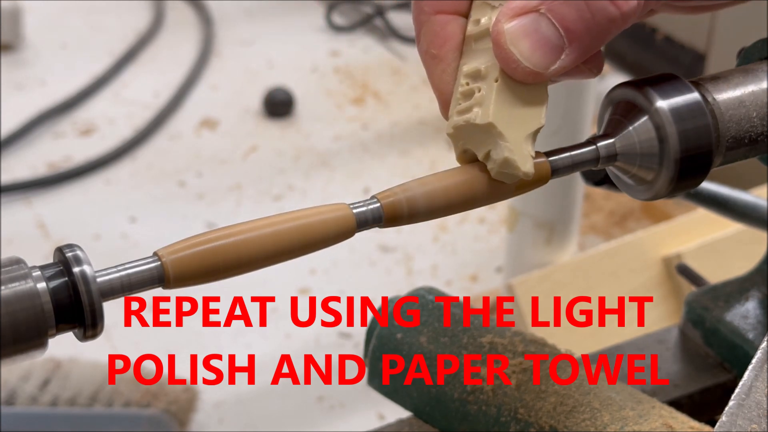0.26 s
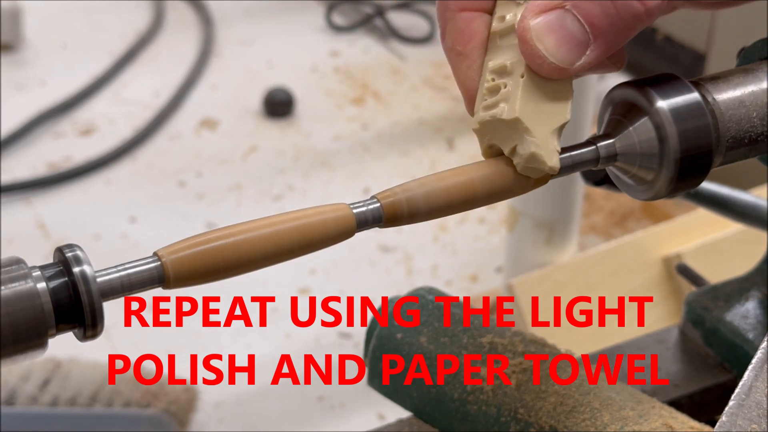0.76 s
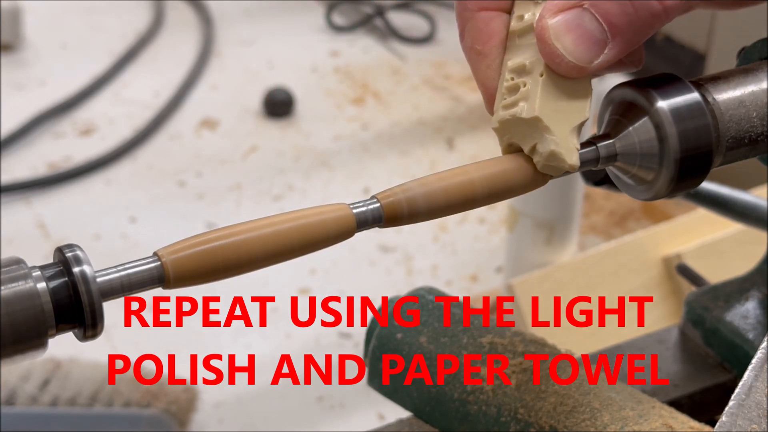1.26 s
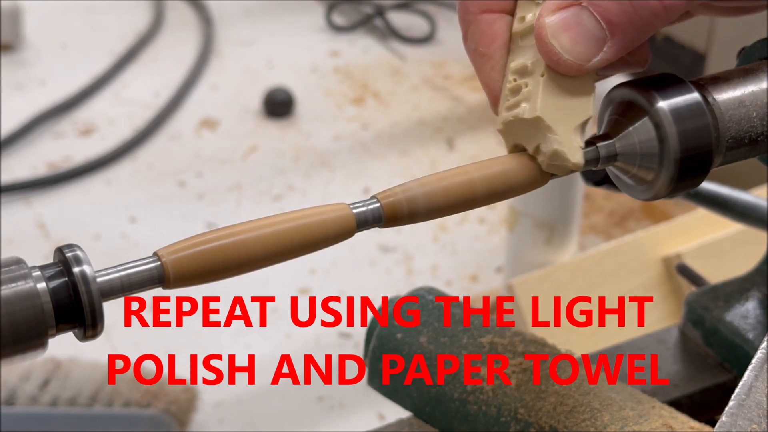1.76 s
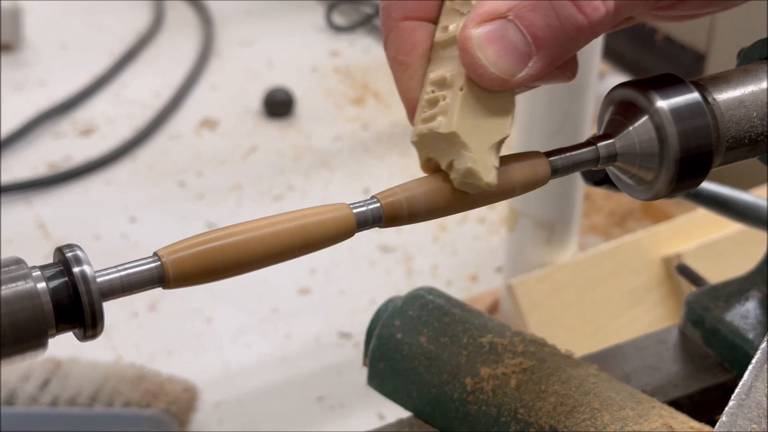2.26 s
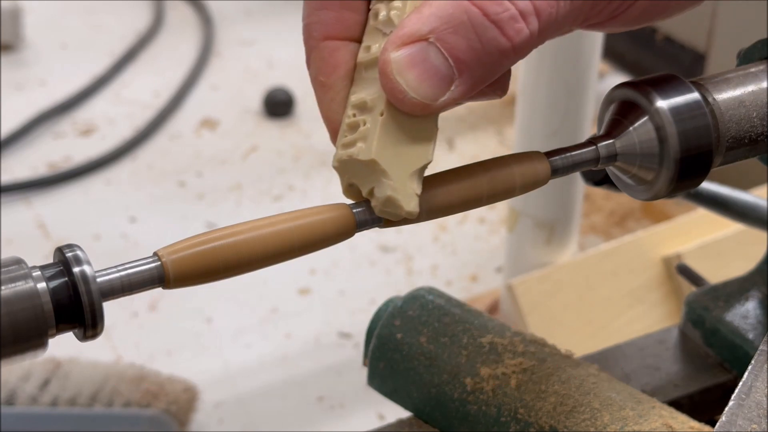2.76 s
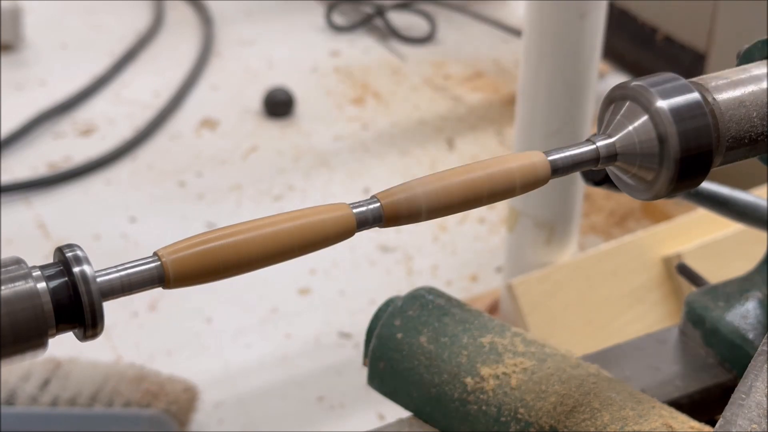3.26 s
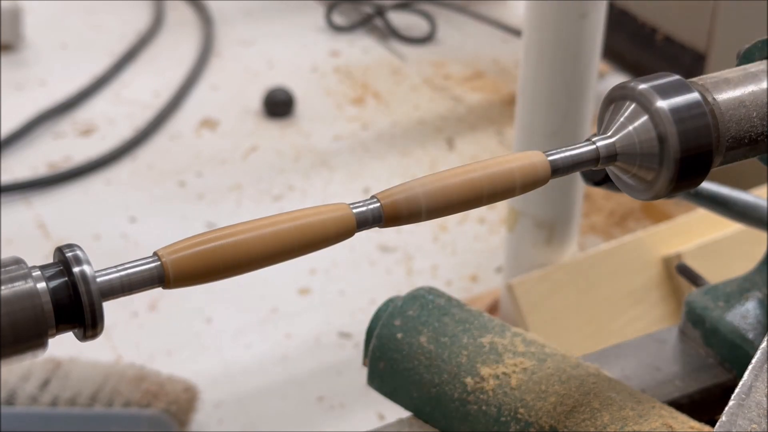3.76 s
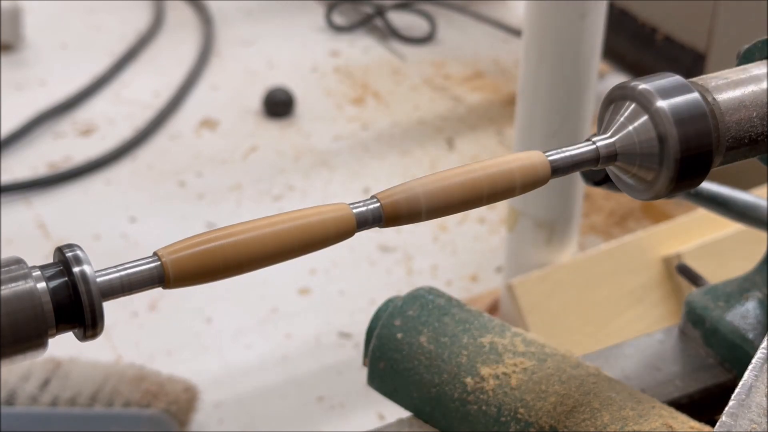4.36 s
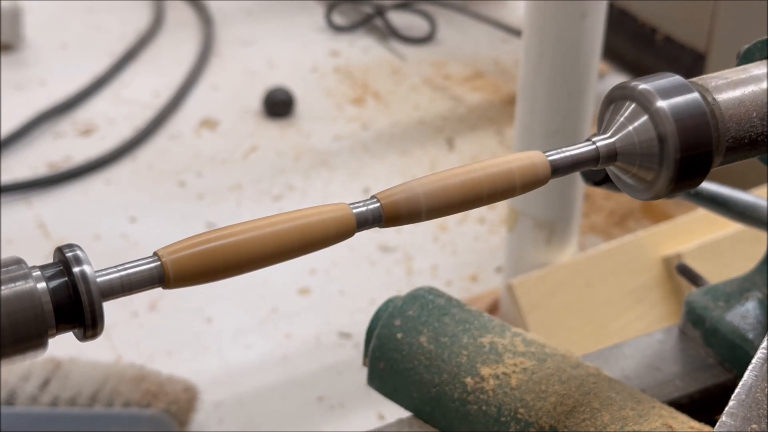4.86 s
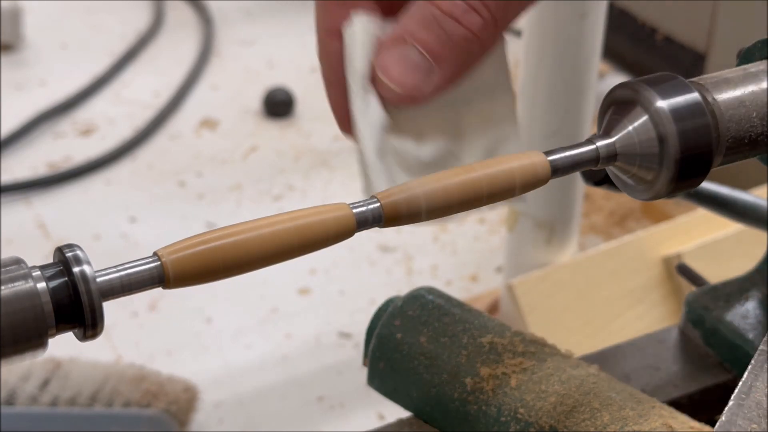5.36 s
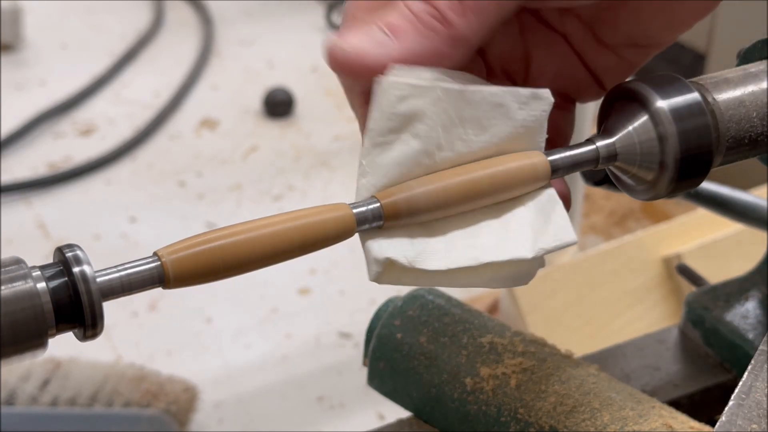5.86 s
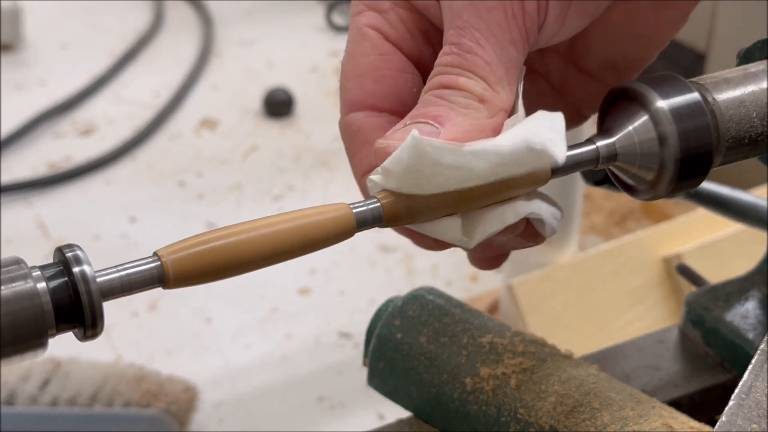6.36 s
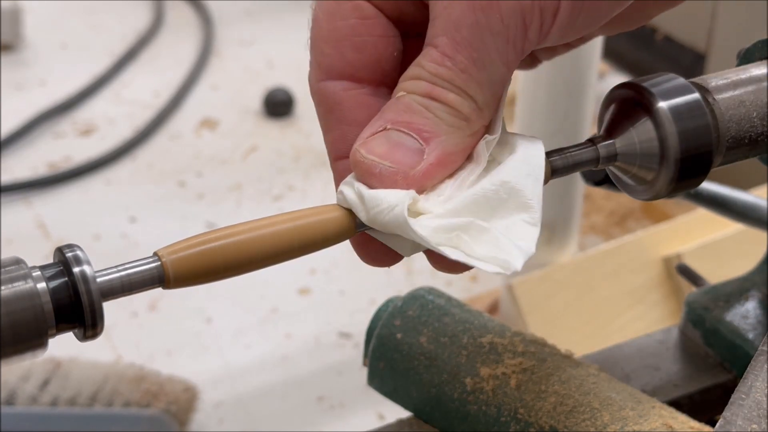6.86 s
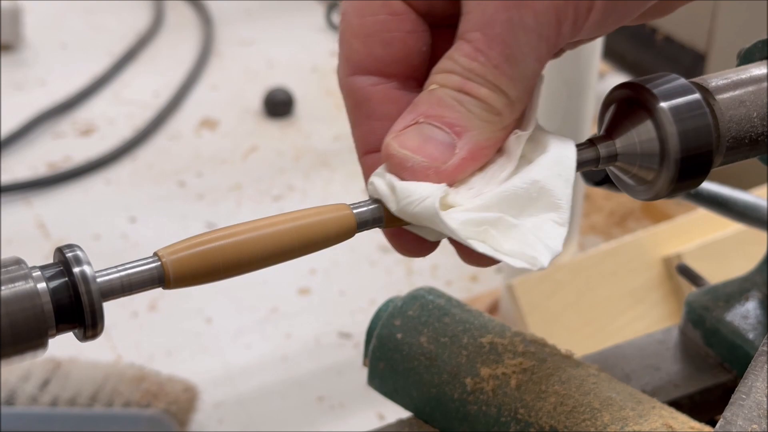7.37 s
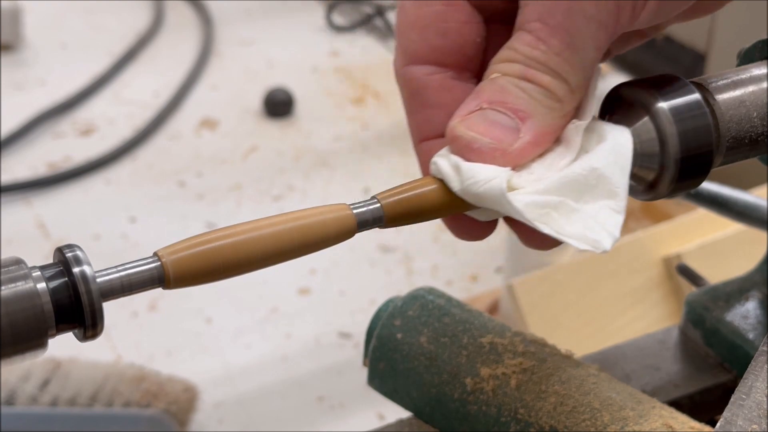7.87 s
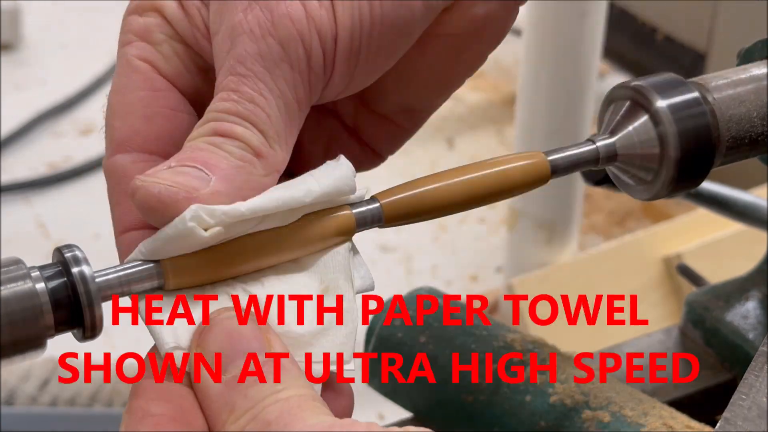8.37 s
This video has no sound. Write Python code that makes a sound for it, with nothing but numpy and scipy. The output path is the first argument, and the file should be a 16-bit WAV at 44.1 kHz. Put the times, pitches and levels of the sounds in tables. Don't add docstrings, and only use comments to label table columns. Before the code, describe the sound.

Steady electric motor hum and rattly mechanical whir dominate, heard close in a workshop. At first a wax block lightly scrapes a spinning wood blank, growing rougher before stopping. The lathe runs free, with one small knock. A tiny click precedes paper towel rubbing, which hisses clearly, slows the spindle very slightly, gives a short rough judder and fades before an abrupt stop.

```python
import sys
import numpy as np
from scipy import signal
from scipy.fft import rfft, irfft, next_fast_len
from scipy.io import wavfile
from scipy.ndimage import map_coordinates

SR = 44100
rng = np.random.default_rng(int(sys.argv[2]) if len(sys.argv) > 2 else 0)


def decibels_to_gain(level_db):
    exponent = np.asarray(level_db, float) / 20
    return 10 ** exponent


def int16_out(signal):
    q = np.round(np.clip(np.atleast_2d(signal).T, -1, 1) * 32767)
    wavfile.write(sys.argv[1], SR, q.astype(np.int16))


N = 379260

BELT_HZ = 8.652
TIME_S = np.arange(N) / SR


def unit(x):
    return x / np.sqrt(np.mean(x ** 2) + 1e-20)


def along(points, hz):
    point_hz, value = np.transpose(points)
    return np.interp(np.log(hz + 1), np.log(point_hz + 1), value)


def curves(rows):
    s, *columns = np.transpose(rows)
    return [np.interp(TIME_S, s, column) for column in columns]


def wobble(rate_hz):
    knots = rng.standard_normal(int(N * rate_hz / SR) + 4)
    return map_coordinates(knots, [np.arange(N) * rate_hz / SR])


def filtered(x, response):
    size = next_fast_len(N + SR // 2)
    hz = np.fft.rfftfreq(size, 1 / SR)
    return irfft(rfft(x, size) * response(hz), size)[..., :N]


def peaks(modes, hz):
    power = 0
    for center_hz, width_hz, db in modes:
        power = power + decibels_to_gain(db) ** 2 / (1 + (2 * (hz - center_hz) / width_hz) ** 2) ** 1.49
    return np.sqrt(power)


def ports(x, gain):
    # Hz, left-right in dB.
    pan = [(60, 1.5), (92, 3), (140, 3.0), (210, 0), (330, 1.0), (500, 3.0), (770, 3.0), (1170, 0),
           (1790, 0.0), (2740, -0.5), (4190, 0.0), (6410, -0.5), (9810, -0.5), (15000, 0.0)]
    # Hz, left lead in radians.
    lead = [(0, 0.5), (1030, -0.56), (3360, 0.47), (5170, 0.48), (6550, -0.0), (7410, 1.46), (7670, 3.0),
            (8530, 2.5), (8870, 4), (9220, 1.5), (10800, -0.15), (13000, 0.6), (13400, -1), (16600, -2)]
    # Hz, likeness 0-1.
    alike = [(60, .99), (200, .95), (500, .87), (1200, .8), (1500, 0.99), (2300, 1), (3500, 0.92),
             (5000, 1), (7000, 0.98), (16000, 0.99)]

    def response(hz):
        turn = np.arccos(np.clip(along(alike, hz), -1, 1)) / 2
        half = decibels_to_gain(along(pan, hz) / 2) * np.exp(0.5j * along(lead, hz))
        left = [half * np.cos(turn), half * np.sin(turn)]
        right = [np.cos(turn) / half, -np.sin(turn) / half]
        return gain(hz) * np.array([left, right])

    return filtered(x[None], response).sum(axis=1)


def tone(phase, rms_db, pan_db, lead_rad, sway_db, drift_rad):
    phase = phase + rng.uniform(0, 2 * np.pi) + drift_rad * wobble(3)
    side = np.array([[0.5], [-0.5]])
    level_db = rms_db + sway_db * wobble(4) + side * pan_db
    return np.sqrt(2) * decibels_to_gain(level_db) * np.sin(phase + side * lead_rad)


def motor():
    pull_hz = 120.02
    # multiple, rms in dB, left-right in dB, left lead in radians.
    hum = [(1, -39.5, 3.1, 0.2), (2, -37, -0.5, 0.39), (3, -54.5, -1.8, -0.1), (4, -63.5, 4.5, 0.6),
           (5, -45.5, 4.5, -0.3), (6, -53.7, 3, -0.8), (7, -53, 3.5, -0.5), (8, -64.8, 10, 0.3),
           (9, -70, 1, -0.2)]
    # Hz, rms in dB, left-right in dB, left lead in radians.
    whine = [(29.4, -68, 2, 0.1), (50.1, -55, 0.5, 0.1), (231.4, -53, 1.5, -0.0), (579.3, -53.5, 8, 0.2),
             (591, -54.5, 8, -0.1), (686, -56.5, 6.5, 0.8), (729.0, -55.5, 0.7, 0.5), (743, -58, 1.5, 0.1),
             (746.3, -53, 4, 0.29), (773.4, -55.5, 6, 0.4), (835.4, -59.5, 6.6, -0.2),
             (864, -55, 1.5, -0.2), (869, -58.5, 4, -0.1), (874.8, -50.5, 3.5, -0.4),
             (902.1, -53.5, 2, -0.6), (923, -53.5, 2, -0.2), (980, -59.5, 0, 0.4),
             (1005, -49.0, -0.9, -0.0), (1008.8, -55, 1, -0.44), (1014.5, -48, -1, -0.7),
             (1133.5, -64, 8.7, 0.6), (1253.4, -67.5, -16, -0.9), (1375, -59.5, 5, -0.3),
             (1490, -63, 5.5, -0.1)]
    turn = 2 * np.pi * TIME_S
    out = np.zeros((2, N))
    for k, db, pan_db, lead_rad in hum:
        out += tone(k * pull_hz * turn, db, pan_db, lead_rad, sway_db=0.74, drift_rad=0.08)
    for hz, db, pan_db, lead_rad in whine:
        out += tone(hz * turn, db, pan_db, lead_rad, sway_db=1.5, drift_rad=0.45)
    return out


def drive():
    # multiple of lap rate, rms in dB, left-right in dB.
    belt = [(7, -46.7, 0.5), (8.01, -54.5, 2), (8.98, -48.5, -0.3), (10, -48, 2.5), (11, -49.5, 1),
            (18.02, -54, 3), (19, -56, 2.3), (21, -55.1, 2.0), (21.98, -50.5, 1), (23, -55.5, 2),
            (24.04, -57.5, 4.5), (30.96, -57, 0.5), (32, -55.5, 2), (34, -58.5, 2), (35.03, -54.9, 1.8),
            (49.9, -54.5, 2), (50.97, -55, -3)]
    # time in seconds, turns per second.
    spindle = [
        (0, 56.05),
        (2.6, 56.05),
        (3.1, 56.3),
        (5.5, 56.35),
        (6.7, 55.8),
        (7.4, 55.45),
        (7.9, 55.05),
        (8.6, 55.4),
    ]
    # multiple of spindle rate, rms in dB, left-right in dB.
    shaft = [(1, -46, 1), (2, -55.5, 3.5), (3, -58.5, 2), (4, -40, 2.5), (5, -57.5, 1), (6, -57.5, -1.5),
             (7, -54.5, 2.5), (8, -56, 0)]
    lap = 2 * np.pi * BELT_HZ * TIME_S + 0.012 * wobble(1.5)
    spin = 2 * np.pi * np.cumsum(curves(spindle)[0]) / SR
    out = np.zeros((2, N))
    for k, db, pan_db in belt:
        out += tone(k * lap, db, pan_db, 0.2, sway_db=1.9, drift_rad=0.25)
    for k, db, pan_db in shaft:
        out += tone(k * spin, db, pan_db, 0.2, sway_db=2.2, drift_rad=0.28)
    return out


def frame():
    # Hz, dB per Hz.
    casting = [(18, -100), (30, -79), (42, -66), (100, -67), (300, -67), (470, -75.5), (520, -76),
               (1100, -76.5), (2200, -82.5), (4000, -82.5), (6300, -87.5), (9000, -86), (11000, -97.5),
               (16000, -99)]
    # Hz, width in Hz, dB per Hz.
    bed_modes = [(60, 20, -61.5), (165, 20, -65), (204, 50, -63), (278, 25, -65), (400.5, 30, -65),
                 (439.4, 29, -63), (592, 32, -62), (740, 21, -64.5), (879.6, 21, -61), (922, 20, -67),
                 (1010, 18, -62.5), (1140, 40, -74.5), (1372, 30, -72.5), (1614, 45, -70.5),
                 (1830, 76, -70.5), (2093, 42, -73)]
    # Hz, width in Hz, dB per Hz.
    housing_modes = [(2360, 160, -81), (2715, 144, -82.5), (2870, 70, -76.5), (3030, 80, -78.5),
                     (3225, 60, -72.5), (3374, 52, -71), (3840, 150, -80), (4254, 90, -78),
                     (4905, 58, -81.5), (5360, 230, -83.5), (5820, 130, -82), (6860, 220, -79.5),
                     (7280, 270, -78), (8000, 200, -90)]
    ball_hz, repeat_share = 145.8, 0.3
    per_hz = np.sqrt(SR / 2)

    lap = rng.standard_normal((round(SR / BELT_HZ), 2))
    laps = np.resize(lap, (N, 2)).T
    fresh = rng.standard_normal((2, N))
    shake = np.sqrt(repeat_share) * laps + np.sqrt(1 - repeat_share) * fresh
    shake = shake * decibels_to_gain(0.71 * wobble(9))
    bed = ports(shake, lambda hz: np.hypot(peaks(bed_modes, hz), decibels_to_gain(along(casting, hz))))

    balls = 1 + 0.28 * np.cos(2 * np.pi * ball_hz * TIME_S + 0.4 * wobble(2))
    unsteady = decibels_to_gain(1.03 * wobble(25) + 0.6 * wobble(5))
    rolling = rng.standard_normal((2, N)) * balls * unsteady
    housing = ports(rolling, lambda hz: peaks(housing_modes, hz))
    return per_hz * (bed + housing)


def above(db, idle_db):
    return np.sqrt(np.maximum(decibels_to_gain(db) ** 2 - decibels_to_gain(idle_db) ** 2, 0))


def friction(colour):
    grit = rng.standard_normal((2, N)) * decibels_to_gain(2.2 * wobble(300) + 1.2 * wobble(30))
    return unit(ports(grit, lambda hz: decibels_to_gain(along(colour, hz))))


def rubbing():
    # time in seconds, friction in dB, sheen in dB.
    rub = [(0.0, -63, -60.5), (0.71, -63.5, -60), (1.36, -62, -67), (1.4, -59.5, -65), (1.71, -64.5, -67),
           (1.84, -62, -65), (1.89, -61.5, -60), (2.0, -59, -57), (2.03, -61, -60), (2.24, -60, -60),
           (2.28, -59, -65), (2.33, -62, -66), (2.58, -60.5, -57), (2.65, -63, -58), (2.7, -60, -58),
           (2.74, -64, -60), (2.79, -64.5, -65), (3.11, -65.5, -68), (4.61, -65.5, -67), (4.77, -68, -70),
           (4.82, -65.5, -65.5), (5.44, -67, -68), (5.46, -60, -60), (5.49, -62, -65), (5.53, -59, -63.5),
           (5.56, -57.5, -57), (5.6, -55, -58), (5.65, -55, -55), (5.7, -56, -56.5), (5.79, -55, -55),
           (5.88, -56, -57), (6.25, -55, -55), (6.3, -50, -52), (6.43, -55.5, -56), (6.46, -55, -54.5),
           (6.66, -55, -55), (6.97, -56.5, -57), (7.05, -57, -57), (7.36, -56.5, -59.5), (7.59, -59, -58.5),
           (7.65, -55, -57), (7.82, -59, -57.5), (7.84, -59, -61), (8.26, -61.5, -61), (8.28, -59.5, -61)]
    # Hz, dB per Hz.
    paper = [(1500, -40), (2300, -3), (4000, 0.5), (6000, -1), (9700, 1), (11000, -4), (12200, -9),
             (13200, -3.5), (16000, -6.5)]
    # Hz, dB per Hz.
    wax = [(12300, -39), (13200, -4), (14200, 2), (16000, -4)]
    # time in seconds, level in dB.
    judder = [(0, -69), (1.3, -62.5), (1.6, -55.5), (2.1, -46), (2.3, -50), (2.4, -57.5), (2.6, -47.5),
              (2.8, -51), (3.1, -71), (5.8, -65.5), (6.3, -53.5), (6.5, -62), (7.5, -61), (7.62, -46),
              (7.69, -41.5), (7.78, -49), (8, -57), (8.6, -61)]
    # Hz, dB per Hz.
    blank = [(300, -39), (500, -8), (1150, 1), (1500, 4), (2500, -3.5), (3000, -11), (4500, -40)]
    idle_db = -66.5
    rub_db, sheen_db = curves(rub)
    hiss = decibels_to_gain(13.0) * above(rub_db, idle_db) * friction(paper)
    hiss_in_sheen_db = np.maximum(rub_db, idle_db) - 4.0
    sheen = decibels_to_gain(5.5) * above(sheen_db, hiss_in_sheen_db) * friction(wax)
    return hiss + sheen + decibels_to_gain(curves(judder)[0]) * friction(blank)


def ticks():
    # start in seconds, peak in dB, pitch in Hz, width in Hz, 60 dB decay in seconds.
    taps = [
        (3.8016, -22.5, 1650, 900, 0.014),
        (5.4577, -27, 8000, 9000, .006),
    ]
    out = np.zeros((2, N))
    t = np.arange(2000) / SR
    for start_s, peak_db, hz, width_hz, t60_s in taps:
        start = round(start_s * SR)
        burst = np.zeros((2, N))
        burst[:, start:start + len(t)] = decibels_to_gain(-60 * t / t60_s) * rng.standard_normal((2, len(t)))
        tap = ports(burst, lambda f: peaks([(hz, width_hz, 0)], f))
        out += decibels_to_gain(peak_db) * tap / np.abs(tap).max()
    return out


def scene():
    return motor() + drive() + frame() + rubbing() + ticks()


def roll_off(x):
    return signal.sosfilt(signal.butter(12, 17040, fs=SR, output="sos"), x)


def record(dry):
    top_hz, stop_s = 15830, 8.2888
    limited = filtered(dry, lambda hz: hz < top_hz)
    mix = limited * (np.arange(N) < stop_s * SR)
    return roll_off(mix)


dry = scene()
out = record(dry)
int16_out(out)
```